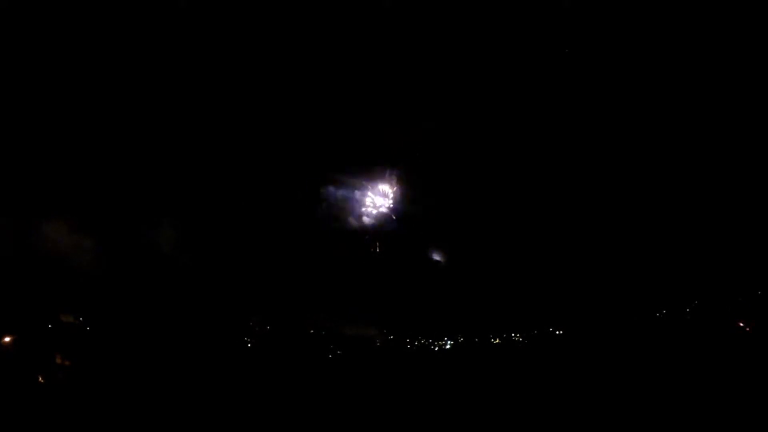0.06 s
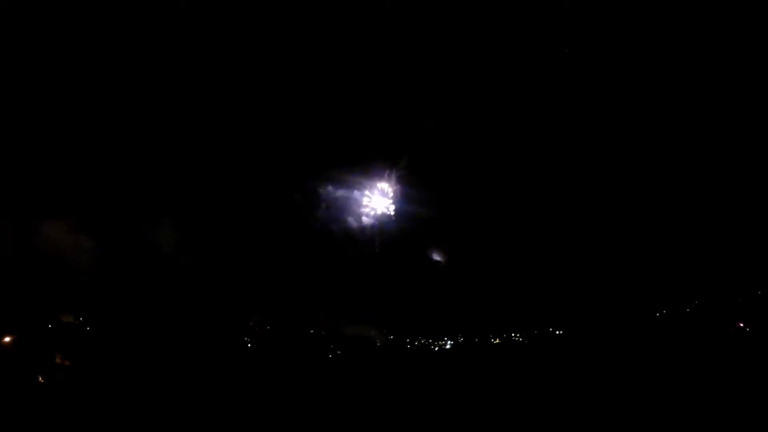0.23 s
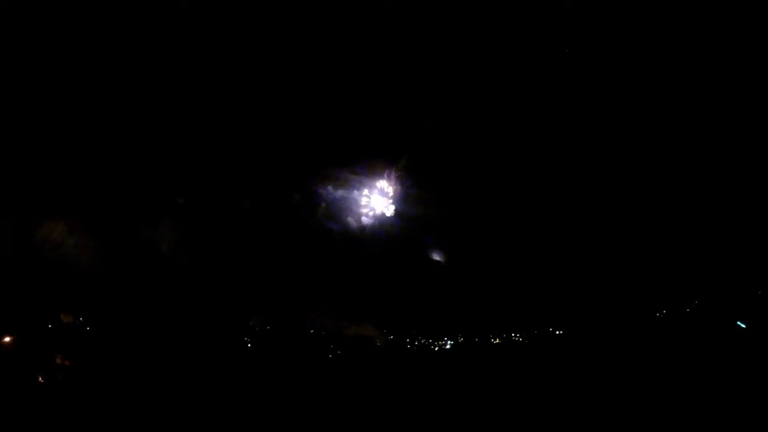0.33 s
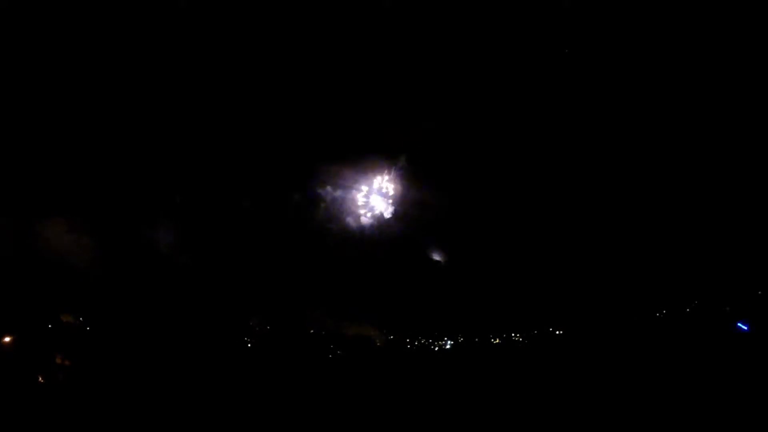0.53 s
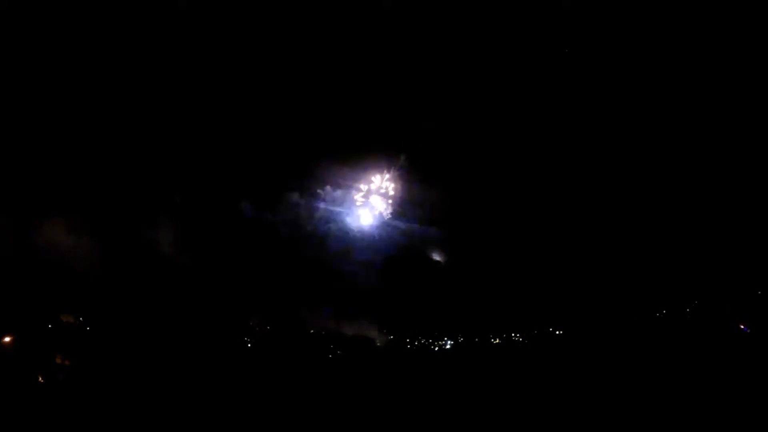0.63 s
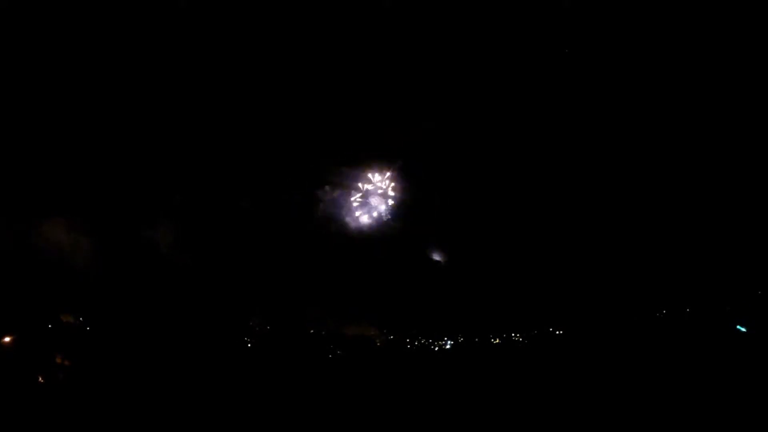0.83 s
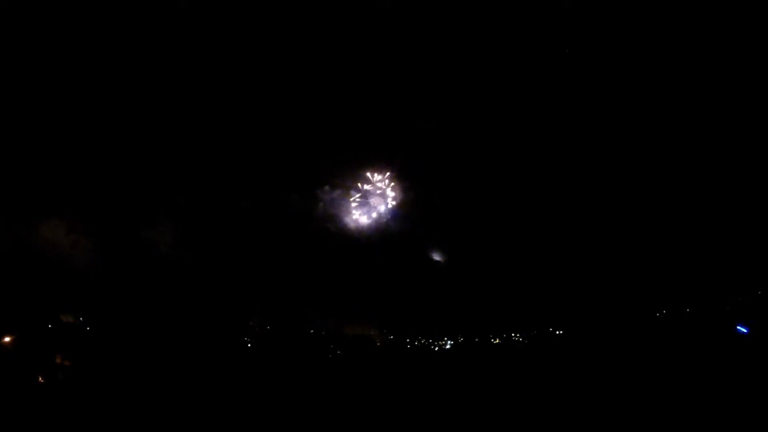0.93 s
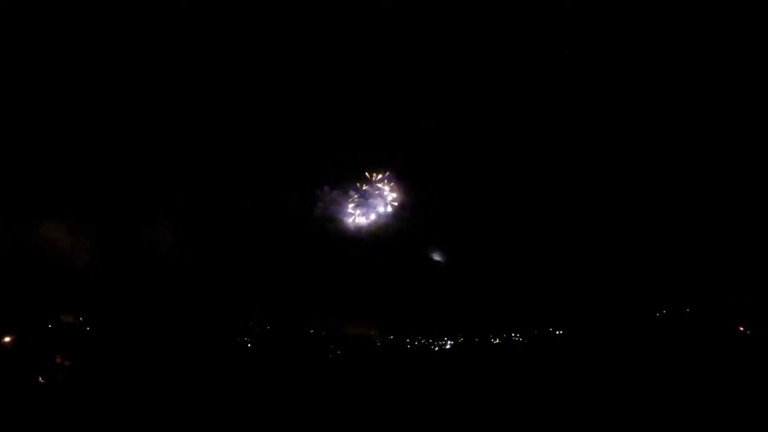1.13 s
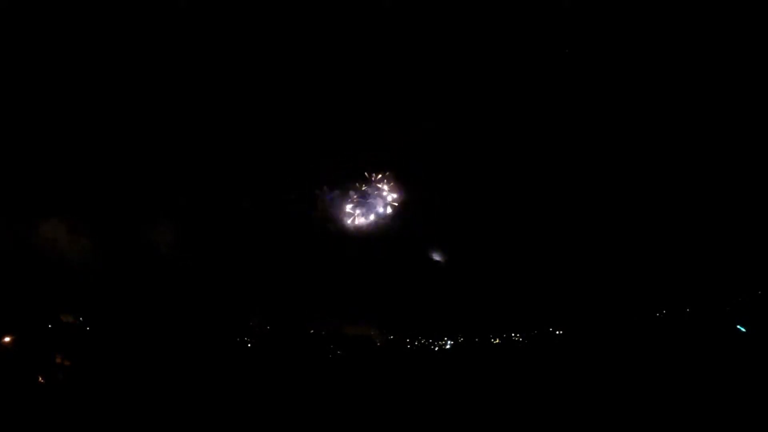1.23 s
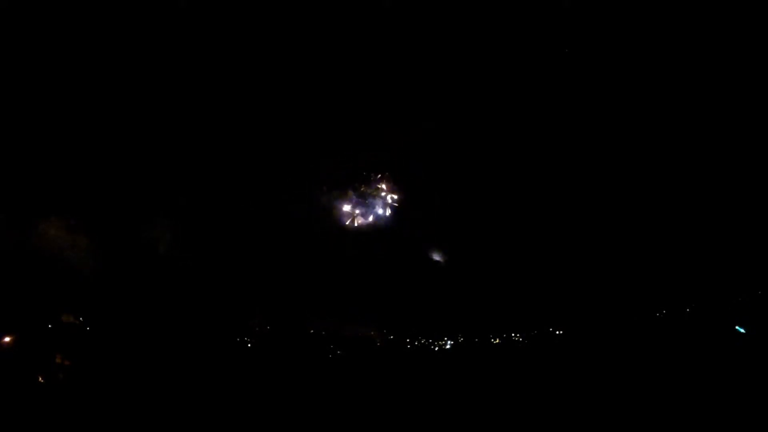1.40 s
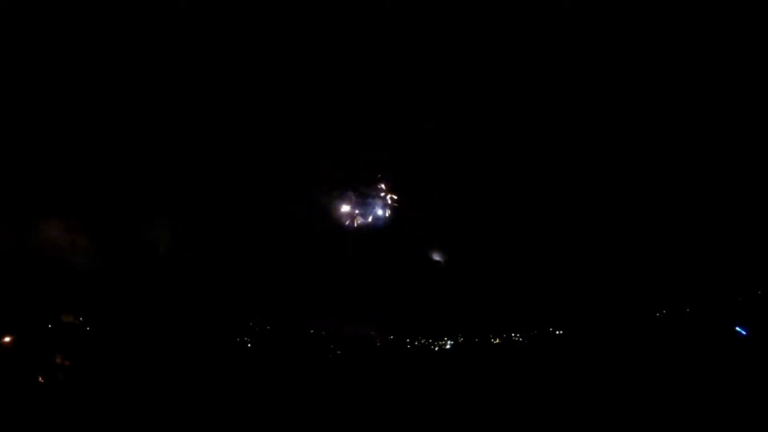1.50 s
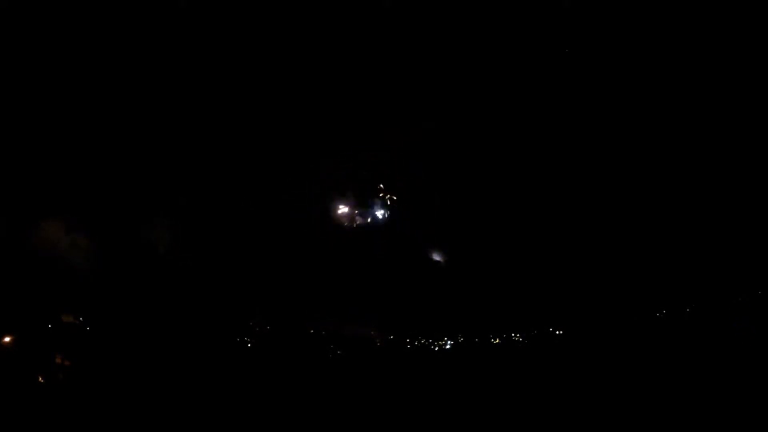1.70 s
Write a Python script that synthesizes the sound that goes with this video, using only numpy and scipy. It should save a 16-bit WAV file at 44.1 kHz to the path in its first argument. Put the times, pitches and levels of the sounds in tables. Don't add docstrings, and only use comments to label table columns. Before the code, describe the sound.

Fireworks: two hard cracks, two deep muffled booms rolling away, then brief dry crackling and pops

```python
import sys
import numpy as np
from scipy import signal
from scipy.fft import rfft, irfft
from scipy.io import wavfile
from scipy.ndimage import uniform_filter1d

SR = 44100
rng = np.random.default_rng(int(sys.argv[2]) if len(sys.argv) > 2 else 0)


def elevation(decibels):
    levels = np.asarray(decibels, float)
    return 10 ** (levels / 20)


def bounce(signal):
    frames = np.transpose(np.atleast_2d(signal))
    limited = np.clip(frames, -1, 1)
    pcm = np.round(limited * 32767).astype(np.int16)
    wavfile.write(sys.argv[1], SR, pcm)


N = 77175

# (pitch [Hz], level [dB per Hz])
NIGHT_HISS = [(30, -2.5), (60, -3.5), (250, -5.5), (700, -15), (1500, -17.5), (3000, -25), (6200, -32.5),
              (14500, -44.5)]
# (pitch [Hz], width [Hz], level [dB])
WHINES = [(6050, 120, -76), (11830, 130, -90)]
# (delay [ms], gain [minus = upside down])
NEAR_ECHOES = [(0.0, 0.45), (0.16, 0.16), (0.25, 0.3), (0.36, 1.0), (0.52, -0.41), (0.7, -0.37),
               (0.79, -0.15), (0.86, -0.35), (1.32, -0.19), (1.52, 0.17), (1.63, 0.35), (1.86, -0.45),
               (1.97, -0.21), (2.15, -0.34), (2.52, -0.33), (2.61, -0.49), (2.7, -0.3), (2.83, 0.19),
               (2.95, 0.32), (3.29, 0.16), (3.65, 0.16), (3.83, 0.19), (4.13, 0.28), (4.33, -0.21),
               (4.54, 0.15), (4.85, 0.14), (5.1, -0.17), (5.58, -0.14), (6.21, -0.19), (6.35, -0.17)]
# (pitch [Hz], level [dB per Hz])
ROLL_TONE = [(120, -4), (250, -10.5), (600, -3.5), (1500, -4.5), (3200, -8), (3900, -14), (6500, -7),
             (9000, -13)]
# (delay [s], level [dB])
ROLL_STRENGTH = [(0, -76), (0.031, -29), (.09, -34), (.17, -32.5), (.24, -29), (.35, -35.5), (.6, -39.5),
                 (.9, -47), (1.5, -48.5)]
# (pitch [Hz], width [Hz], level [dB])
HOLLOW_SPOTS = [(1540, 170, -2), (2923, 665, -1), (4460, 1970, -6.5)]
# (time [s], peak level [dB])
LONE_POPS = [(1.1801, -31.5), (1.2029, -35), (1.214, -36.5), (1.2195, -31), (1.239, -32), (1.2523, -34.5),
             (1.257, -30.5), (1.2735, -26.5), (1.2869, -33.5), (1.2959, -29), (1.3087, -34),
             (1.3183, -35.5), (1.325, -36), (1.3358, -41), (1.3448, -24.5), (1.3602, -30), (1.3934, -25.5),
             (1.4202, -32.5), (1.4464, -26.5), (1.5484, -25.5), (1.5683, -35), (1.5744, -24.5),
             (1.6097, -31.5), (1.6244, -35), (1.6272, -48), (1.64, -29.5), (1.6544, -31)]
# (time [s], level [dB])
PATTER = [
    (1.29, -48),
    (1.33, -22.5),
    (1.37, -20),
    (1.462, -21.5),
    (1.535, -24.5),
    (1.585, -32.5),
    (1.598, -60),
]
# (time [s], level [dB], pitch [Hz], time to fall 60 dB [s])
DEEP_THUMPS = [
    (0.2045, -44, 59.2, 0.069),
    (0.4059, -26, 89, 0.083),
    (0.471, -26, 84, 0.12),
]
# (time [s], level [dB], shock length [ms], share of slow push [0-1], air cut-off [Hz])
SHELL_BURSTS = [(.20211, -1, 0.12, 0.43, 5020), (.2505, -8, 0.16, 0.14, 4860),
                (.4069, -3.5, 0.08, 0.13, 1720), (.40872, -6.5, 0.077, 0.14, 1650),
                (.4099, -25, .06, .05, 2630), (0.4376, -23.5, 0.16, 0.14, 1800),
                (.5045, -25, .1, 0.14, 1810), (.4515, -17.5, 0.13, 0, 1700),
                (.4521, -20.5, 0.13, 0.25, 1720), (.46827, -8.5, 0.15, 0.17, 1230),
                (.46972, -5.5, 0.063, 0.16, 1270), (.4713, -11.5, 0.11, 0.18, 1210),
                (.4735, -21, 0.23, 0.22, 1800), (.4785, -19, 0.14, 0.03, 1860),
                (1.4719, -20.5, 0.14, 0.04, 4130), (1.47608, -9.5, 0.092, 0.05, 4270),
                (1.47789, -14.5, 0.12, 0.09, 3830), (1.68585, -12, 0.085, 0.03, 4280)]


def unit(x):
    return x / np.sqrt(np.mean(x ** 2))


def cut(x, hz, kind="low", order=4):
    return signal.sosfilt(signal.butter(order, hz, kind, fs=SR, output="sos"), x + 1e-18)


def band(x, hz, width):
    return cut(x, [hz - width / 2, hz + width / 2], "bandpass", order=1)


def noise(table):
    hz, db = np.array(table).T
    f = np.maximum(np.arange(N // 2 + 1) * SR / N, 1)
    shape = elevation(np.interp(np.log(f), np.log(hz), db))
    shape = shape * np.minimum(f / hz[0], 1) ** 2
    return unit(irfft(rfft(rng.standard_normal(N)) * shape, N))


def walk(rate):
    k = int(SR / rate)
    steps = np.repeat(rng.standard_normal(N // k + 1), k)
    return unit(uniform_filter1d(steps, k)[:N])


def clicks(s, gain):
    at, out = np.asarray(s) * SR, np.zeros(N + 1)
    i = at.astype(int)
    np.add.at(out, i, gain * (1 - at + i))
    np.add.at(out, i + 1, gain * (at - i))
    return out[:N]


def wave(ms):
    u = np.arange(N // 40) / SR * 1000 / max(ms, .02)
    return -(1 - u) * np.exp(-u)


def through(x, response):
    return signal.fftconvolve(x, response)[:N]


def night_air():
    return elevation(-53 + 1.14 * walk(12.24)) * noise(NIGHT_HISS)


def whine():
    return sum(elevation(db) * unit(band(rng.standard_normal(N), hz, width)) for hz, width, db in WHINES)


def town():
    wall_s, wall_db, smear_s = 0.013, -21.5, 0.0064
    t = np.arange(N) / SR
    late = np.maximum(t - wall_s, 0)
    wall = (t > wall_s) * np.exp(-late / smear_s) * rng.standard_normal(N) * elevation(wall_db) / 8
    delay, strength_db = np.array(ROLL_STRENGTH).T
    patchy_db = 2.5 * walk(59.4)
    roll = noise(ROLL_TONE) * elevation(np.interp(t, delay, strength_db) + patchy_db) / 30
    return wall, roll


def nearby():
    scatter_db, from_ms, t60_s = -32, 3.7, 0.09
    ms, gain = np.array(NEAR_ECHOES).T
    late = np.maximum(np.arange(N // 40) / SR - from_ms / 1000, 0)
    scatter = (late > 0) * elevation(scatter_db - 60 * late / t60_s) * rng.standard_normal(len(late))
    return clicks(ms / 1000, gain)[:len(late)] + scatter


def hollows(x):
    return x + sum(elevation(db) * band(x, hz, width) for hz, width, db in HOLLOW_SPOTS)


def crackle():
    pop_db, pop_ms, pop_hz, pop_low_hz = 8, 0.11, 5110, 1050
    twin_s, twin_db = 0.0033, -5.5
    per_s, scatter_db = 310, 3.5
    chance = rng.random((400, 3))

    s, db = np.array(LONE_POPS).T
    lone = clicks(s, elevation(db + pop_db))
    twins = clicks(s + twin_s * chance[:len(s), 2], elevation(db + pop_db + twin_db))

    at, level_db = np.array(PATTER).T
    gaps = -np.log(.03 + .97 * chance[:, 0]) / per_s
    when = at[0] + np.cumsum(gaps)
    size_db = np.interp(when, at, level_db) - scatter_db * np.log(0.098 + chance[:, 1])
    on = when < at[-1]
    patter = clicks(when[on], elevation(size_db[on] - 4))

    pop = cut(cut(wave(pop_ms), pop_hz), 1.17 * pop_hz)
    return cut(through(lone + twins + patter, pop), pop_low_hz, "high", order=2)


def thumps():
    rumble_db, rumble_t60_s, rumble_hz = -17.5, 1.9, 141
    t = np.arange(N) / SR
    swing = np.zeros(N)
    for s, db, hz, t60 in DEEP_THUMPS:
        since = np.maximum(t - s, 0)
        swing += elevation(db) * np.sin(2 * np.pi * hz * since) * elevation(-60 * since / t60)
    valley = unit(cut(rng.standard_normal(N), rumble_hz, order=2))
    valley = valley * elevation(rumble_db - 60 * t / rumble_t60_s) / 300
    return swing + through(swing, valley)


def blasts():
    snap_db, snap_hz, push_ms = -18.5, 9550, 1.17
    first = clicks([SHELL_BURSTS[0][0]], elevation(snap_db))
    out = cut(first, [snap_hz / 1.07, snap_hz * 0.98], "bandpass", order=1)
    for s, db, ms, push, hz in SHELL_BURSTS:
        burst = cut(wave(ms) + push * wave(push_ms), hz)
        out = out + through(clicks([s], elevation(db)), burst)
    return out


def scene():
    star_roll_db, diffuse = -4.5, 0.81
    shells = blasts()
    stars = elevation(-2.5) * hollows(crackle())
    wall, roll = town()
    sky = shells + stars
    rolled = elevation(-1.0) * hollows(through(shells + elevation(star_roll_db) * stars, roll))
    arriving = sky + through(sky, wall) + (1 - diffuse) * rolled
    heard = through(arriving, nearby()) + 2 * diffuse * rolled
    return (heard + thumps() + night_air() + whine())[None]


def low_pass(x):
    return signal.sosfilt(signal.butter(12, 15660, fs=SR, output="sos"), x)


def record(dry):
    top_cut = signal.ellip(8, .2, 60, 14950, fs=SR, output="sos")
    mix = signal.sosfilt(top_cut, dry)
    return low_pass(mix)


dry = scene()
out = record(dry)
bounce(out)
```